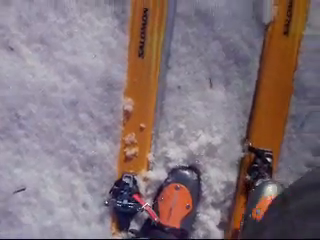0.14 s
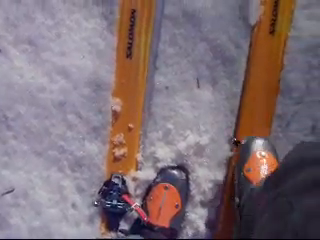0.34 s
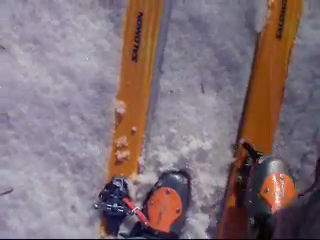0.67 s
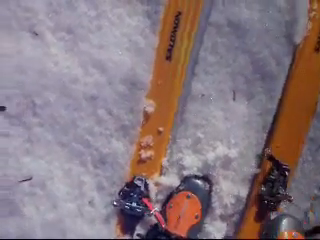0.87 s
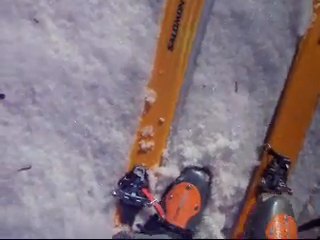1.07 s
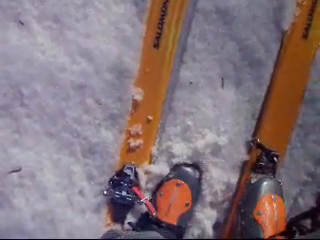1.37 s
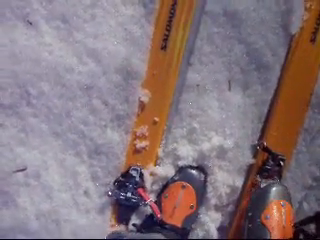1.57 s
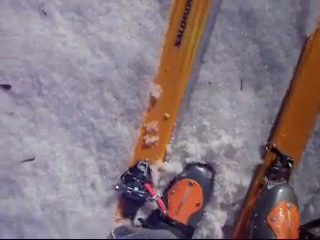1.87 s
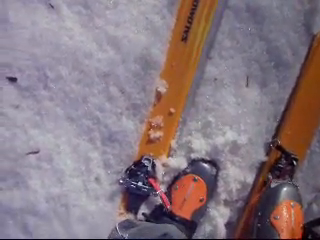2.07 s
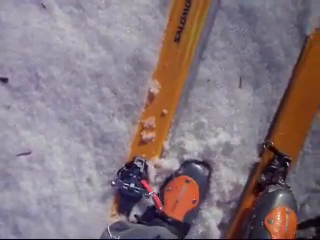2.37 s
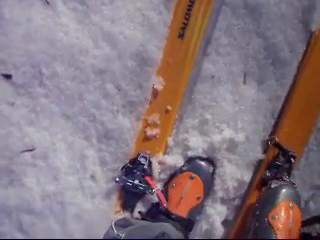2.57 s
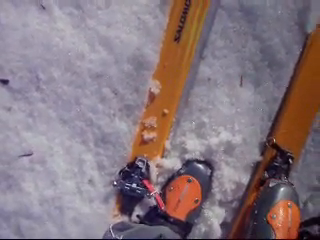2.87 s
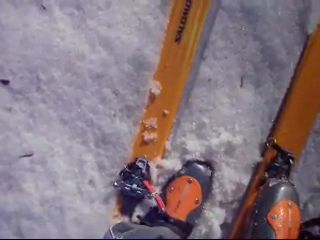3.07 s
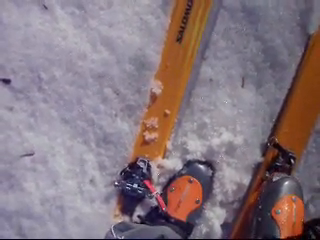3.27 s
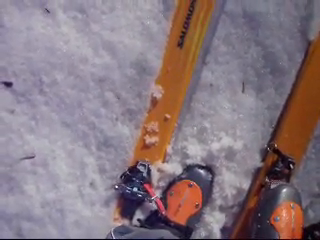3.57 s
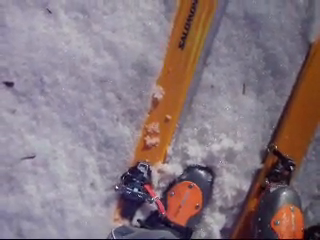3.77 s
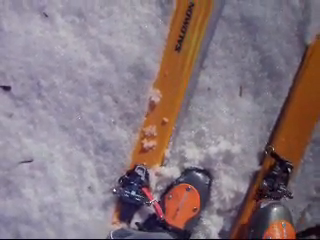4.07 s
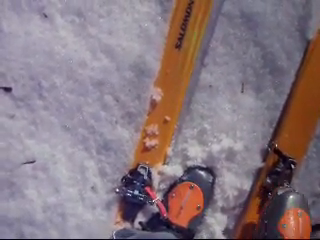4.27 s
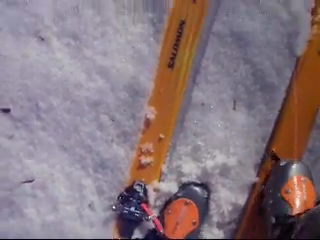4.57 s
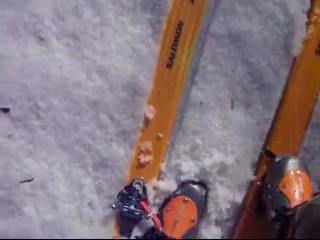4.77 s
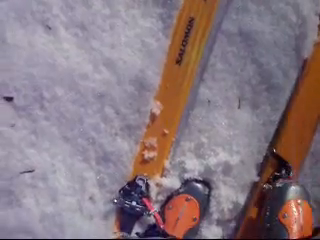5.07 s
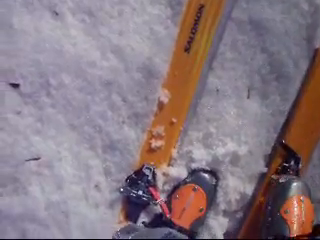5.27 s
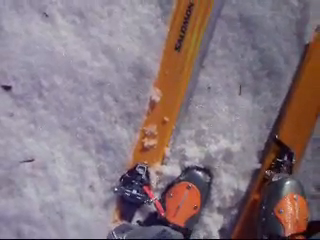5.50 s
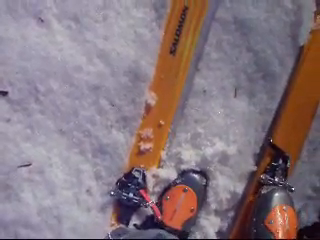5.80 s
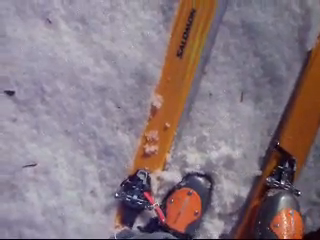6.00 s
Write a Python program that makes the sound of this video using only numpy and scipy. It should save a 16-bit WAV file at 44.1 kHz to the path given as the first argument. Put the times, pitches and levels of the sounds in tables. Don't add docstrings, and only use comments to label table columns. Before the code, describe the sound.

Outdoors on snow, a hard plastic ski boot is worked into a steel binding. A light knock and scrape come first, then a dense loud flurry of sharp clicks and scrapes. Softer scuffs and an isolated double click follow, then a long near-silence of faint hiss and dull bumps. A second short burst of clatter ends in a heavy clunk and fading ticks. The small camera microphone is close, coarse and harsh.

```python
import sys
import numpy as np
from scipy import signal
from scipy.io import wavfile
from scipy.ndimage import uniform_filter1d

SR = 44100
rng = np.random.default_rng(int(sys.argv[2]) if len(sys.argv) > 2 else 0)


def store_wav(level_fs):
    pcm = np.round(np.clip(np.atleast_2d(level_fs), -1, 1) * 32767)
    wavfile.write(sys.argv[1], SR, pcm.T.astype(np.int16))


def natural_amplitude(level_db):
    exponent = np.asarray(level_db, float) / 20
    return 10 ** exponent


N = 270754

# (frequency [Hz], bandwidth [Hz], level [dB])
MODES = [(375, 240, -7.5), (641, 240, -2), (967, 260, -1), (1250, 190, -3.5), (1560, 170, -4),
         (1794, 250, -3.5), (2227, 250, -3), (2527, 300, -3.5), (2911, 200, 0.5), (3105, 180, 2.5),
         (3257, 210, 3), (3490, 220, -1.5)]


def rms_one(x):
    return x / np.sqrt(np.mean(x ** 2) + 1e-20)


def drift(rate_hz):
    pole = np.exp(-80 * np.pi * rate_hz / SR)
    settling = 2000
    noise = rng.standard_normal(N // 40 + settling + 2)
    slow = signal.lfilter([1], [1, -2 * pole, pole * pole], noise)[settling:]
    return np.interp(np.arange(N) / 40, np.arange(len(slow)), rms_one(slow))


def resonance(x, hz, width_hz):
    r = np.exp(-np.pi * width_hz / SR)
    feedback = [1, -2 * r * np.cos(2 * np.pi * hz / SR), r * r]
    return signal.lfilter([(1 - r * r) / 2, 0, (r * r - 1) / 2], feedback, x)


def band(x, low_hz, high_hz):
    return signal.sosfilt(signal.butter(2, [low_hz, high_hz], "band", fs=SR, output="sos"), x)


def click(struck_hz, body_db, steel_db, t60_s):
    t = np.arange(4096) / SR
    rattle = rng.standard_normal(len(t)) * natural_amplitude(-60 * t / t60_s)
    rattle[:3] += 4.4
    mode_hz = [hz for hz, _, _ in MODES]
    colour_db = np.interp(np.log(mode_hz), np.log([600, 1500, 2900]), [body_db, 0, steel_db - 2.5])
    colour_db += 3.2 * rng.standard_normal(len(MODES))
    hit = natural_amplitude(colour_db.max() + 1.5) * resonance(rattle, struck_hz, 260)
    for (hz, width_hz, db), extra_db in zip(MODES, colour_db):
        hit += natural_amplitude(db + extra_db) * resonance(rattle, hz, 1.3 * width_hz)
    hit = signal.sosfilt(signal.butter(4, 4400, fs=SR, output="sos"), hit)
    return hit / np.abs(hit).max()


def clicks():
    # (time [s], peak [dB], struck part [Hz], plastic body, relative [dB])
    snaps = [(.55, -15, 2840, -12), (.592, -12, 3197, 7), (0.593, -12, 3030, -6), (.855, -9.5, 2510, -30),
             (0.882, -18, 3200, -22), (.932, -15.5, 3200, -15), (.964, -7.5, 2830, -7),
             (.983, -7, 2820, -5.5), (0.991, -16.5, 2800, -12), (1.084, -5, 2810, -25),
             (1.174, -11.5, 2660, -27), (1.186, -7, 3070, -38), (1.246, -17, 2700, -26),
             (1.267, -19.5, 2620, -12.5), (1.292, -10.5, 2590, -34), (1.355, -14.5, 2530, -24),
             (1.782, -19, 2570, -13), (2.5, -9.5, 3040, -14), (2.503, -12, 3280, -15),
             (2.912, -21.5, 3250, -11), (4.706, -9.5, 2670, -14), (4.72, -13, 2900, -11),
             (4.743, -17, 2850, -1), (4.811, -19, 2800, -5), (4.831, -23, 2900, -17),
             (4.869, -20.5, 3340, -28), (4.927, -10, 2410, -19), (5.104, -20, 2490, -21),
             (5.136, -22, 3160, -27), (5.971, -25, 3170, -19)]
    # (time [s], peak [dB], struck part [Hz], plastic body, relative [dB])
    knocks = [(.121, -27, 1556, -19), (.129, -13, 630, 7), (.561, -16, 1400, -14), (.582, -3.5, 1500, -10),
              (.605, -3.5, 1580, -7.5), (.914, -24.5, 1440, -20), (.92, -22, 820, 8),
              (1.395, -27.5, 1680, -1), (1.594, -29, 1330, -7), (1.706, -27.5, 2000, 15),
              (1.774, -25, 1010, -11), (1.793, -17, 2180, 13), (1.808, -26, 2180, 3),
              (1.859, -24, 695, -13), (2.217, -30, 1940, -13), (2.293, -30, 1507, 12),
              (2.425, -22, 1170, -7), (4.683, -24.5, 1370, -3), (4.758, -19.5, 2280, 6),
              (4.768, -21, 1070, -1), (4.78, -15, 2160, -6), (4.787, -27, 1030, 8), (4.798, -15, 2180, -12),
              (4.802, -22, 2220, -3), (4.856, -27, 1030, -18), (4.9144, -6, 2330, -12.5),
              (4.916, -3, 1480, -7.5), (5.165, -25, 2450, -15), (5.224, -26.5, 1250, -8),
              (6.025, -26.5, 1260, -19)]
    # (time [s], peak [dB], struck part [Hz])
    touches = [(0.104, -32, 910), (0.872, -26, 2720), (.188, -22, 2560), (.215, -22, 3000),
               (.277, -25, 2720), (0.288, -31, 2650), (.62, -24, 3200), (.635, -31, 930),
               (.651, -29.5, 3180), (1.203, -29, 3260), (1.366, -31, 2560), (2.418, -22, 3000),
               (2.514, -22, 2500), (3.465, -35.5, 1160), (3.748, -35, 3050), (4.822, -35, 3040),
               (4.908, -26.5, 2930), (5.322, -40, 1130), (5.506, -31, 1940), (5.59, -32, 1480),
               (5.709, -36.5, 1590), (5.782, -28.5, 3340), (5.812, -36, 598), (5.84, -31, 583),
               (5.923, -30, 2340), (6.003, -26.5, 3252), (6.128, -28, 505)]
    # (struck part [Hz], steel, relative [dB])
    steel_share = [(600, -8.5), (1500, -0.5), (2600, 0.5), (3300, 4.5)]
    snap_t60_s, knock_t60_s, touch_t60_s = .030, .032, .026
    touch_body_db = -1.5

    blows = [(*row, snap_t60_s) for row in snaps]
    blows += [(*row, knock_t60_s) for row in knocks]
    blows += [(*row, touch_body_db, touch_t60_s) for row in touches]
    share_hz, share_db = np.transpose(steel_share)
    out = np.zeros(N + 4096)
    for s, peak_db, struck_hz, body_db, t60_s in blows:
        steel_db = np.interp(np.log(struck_hz), np.log(share_hz), share_db)
        hit = click(struck_hz, body_db, steel_db, t60_s)
        at = round((s - .0006) * SR)
        out[at:at + len(hit)] += natural_amplitude(peak_db + 4.5) * hit
    return out[:N]


def grains(per_s, spread_db, clump_db):
    sizes = natural_amplitude(spread_db * np.minimum(rng.exponential(1, N), 5)) * rng.choice([-1, 1], N)
    struck = rng.random(N) < per_s / SR
    return sizes * struck * natural_amplitude(clump_db * drift(70))


def scrapes():
    # (start [s], hardest [s], end [s], steel level [dB], sole level relative to steel [dB])
    drags = [(0.111, 0.124, 0.14, -31, -8.5), (0.141, 0.206, .24, -37.5, -0.5),
             (0.263, 0.258, 0.36, -42.5, -4.5), (0.552, 0.575, 0.62, -27, 4),
             (0.625, 0.65, 0.72, -45.5, -8.5), (0.822, 0.872, 0.9, -31, -5.5),
             (0.906, 0.952, 1.053, -34.5, -0.5), (1.095, 1.108, 1.18, -34, -9),
             (1.55, 1.586, 1.58, -47, 0.5), (1.644, 1.795, 2.02, -41.5, -0.8),
             (2.394, 2.422, 2.5, -45.5, -1), (2.501, 2.51, 2.55, -40.5, -3.5), (2.528, 2.54, 2.47, -50, -9),
             (4.701, 4.72, 4.73, -20.5, -1.5), (4.742, 4.765, 4.81, -37.5, 0.5),
             (4.81, 4.817, 4.86, -40.5, 0), (4.914, 4.922, 5.0, -44.5, -4),
             (5.123, 5.135, 5.17, -34.5, -3.5), (5.137, 5.18, 5.18, -32, 1.5), (5.202, 5.22, 5.37, -49, -5),
             (5.483, 5.53, 5.53, -50, 1), (5.9, 6.0, 6.07, -48.5, -4), (2.17, 2.222, 2.36, -53.5, -4),
             (3.435, 3.47, 3.46, -52, 0)]
    edge_db, hold = -12.5, 2.8
    shell_db, shell_follows = -6.5, 0.95

    grit = grains(per_s=9000, spread_db=1.9, clump_db=1.3)
    ring = []
    for k, (hz, width_hz, db) in enumerate(MODES):
        gain = (-1) ** k * natural_amplitude(db + 1.7 * drift(17))
        ring.append(gain * resonance(grit, hz, 1.6 * width_hz))
    steel, sole, shell = sum(ring[7:]), sum(ring[3:7]), sum(ring[:3])
    groups = np.array([rms_one(steel), rms_one(sole), rms_one(shell)])

    pressure, t = np.zeros((3, N)), np.arange(N) / SR
    for start, hardest, end, steel_db, sole_db in drags:
        span = slice(round(start * SR), round(end * SR))
        swell_db = edge_db * np.interp(t[span], [start, hardest, end], [1, 0, 1]) ** hold
        group_db = np.array([[0], [sole_db], [shell_db + shell_follows * sole_db]])
        pressure[:, span] += natural_amplitude(2.0 + steel_db + swell_db + group_db)
    return np.sum(uniform_filter1d(pressure, size=160) * groups, axis=0)


def bumps():
    # (time of peak [s], peak [dB], frequency [Hz])
    pushes = [(.13, -33, 316), (.583, -22.5, 271), (.606, -29, 310), (0.94, -35, 325), (.964, -31, 350),
              (.983, -30, 350), (0.999, -31, 370), (1.018, -25.5, 320), (1.083, -29.5, 308),
              (1.1, -35, 282), (1.155, -33.5, 304), (1.186, -36.5, 316), (1.477, -27, 191),
              (1.555, -43, 240), (1.617, -35.5, 189), (1.773, -35, 305), (1.839, -28, 367),
              (1.876, -33, 270), (2.464, -36, 169), (2.504, -31.5, 268), (3.15, -39, 145),
              (3.201, -38.5, 154), (3.224, -37, 248), (3.655, -34.5, 259), (3.974, -34, 264),
              (4.155, -38, 140), (4.716, -32, 315), (4.916, -18.5, 360), (5.177, -20, 348.5),
              (5.795, -36.5, 275)]
    out, t = np.zeros(N + 4096), np.arange(4096) / SR
    for s, peak_db, hz in pushes:
        rise = t * hz / 0.59
        swell = (rise * np.exp(1 - rise)) ** 2
        at = round((s - 1.1 / hz) * SR)
        out[at:at + len(t)] += natural_amplitude(peak_db + 0.5) * swell * np.sin(2 * np.pi * hz * t)
    return out[:N]


def breeze():
    # (frequency [Hz], level per Hz [dB])
    spectrum = [(18, -42), (30, -20), (131, -7.5), (281, -3), (317, -6), (350, -2.5), (753, -4.5),
                (867, -5), (1320, -8.5), (3700, -11.5), (4810, -47), (8140, -120)]
    # (time [s], level [dB])
    strength = [(0.0, -47), (.58, -44), (1.02, -46), (1.5, -45.5), (2.5, -47.5), (3.1, -48), (4.14, -47),
                (4.4, -48), (4.92, -44.5), (5.44, -48), (6.14, -45.5)]
    s, db = np.transpose(strength)
    air_db = np.interp(np.arange(N) / SR, s, db)
    white = rng.standard_normal((2, N))
    band_edges_hz = 40 * 2 ** np.arange(0, 7, .5)
    hz, db = np.transpose(spectrum)
    far = np.zeros(N)
    for k, (low, high) in enumerate(zip(band_edges_hz, band_edges_hz[1:])):
        band_db = np.interp(np.log(low * high) / 2, np.log(hz), db)
        far += natural_amplitude(band_db + 1.2 * drift(6)) * band(white[k % 2], low, high)
    return natural_amplitude(air_db + 1.0) * rms_one(far)


def wind():
    # (time [s], peak [dB])
    puffs = [
        (.58, -47),
        (1.02, -48),
        (1.47, -37.5),
        (2.48, -43),
        (3.13, -53),
        (3.64, -55.5),
        (4.14, -52),
        (4.92, -49),
    ]
    calm_db, rise_db_per_s, fall_db_per_s = -64.5, 113, 105.5
    t = np.arange(N) / SR
    wind_db = np.full(N, calm_db)
    for s, db in puffs:
        below_peak_db = np.maximum(rise_db_per_s * (s - t), fall_db_per_s * (t - s))
        wind_db = np.maximum(wind_db, db - below_peak_db)
    lumpy = band(rng.standard_normal(N), 70, 260) * natural_amplitude(4.6 * drift(5.9))
    return natural_amplitude(wind_db - 5.5) * rms_one(lumpy)


def scene():
    near = clicks() + scrapes()
    lag = round(.0032 * SR)
    near[lag:] += natural_amplitude(-19.0) * near[:-lag]
    return (near + bumps() + breeze() + wind())[None]


def drop_faint(x):
    # (low edge [Hz], high edge [Hz], limit [dB])
    faint_bands = [
        (20, 100, -66.5),
        (3900, 4100, -95),
        (7860, 8140, -84),
        (11900, 12150, -79),
    ]
    masked = uniform_filter1d(x ** 2, size=1000) * natural_amplitude(-44) ** 2
    for low_hz, high_hz, limit_db in faint_bands:
        sos = signal.butter(3, [low_hz, high_hz], "band", fs=SR, output="sos")
        part = signal.sosfiltfilt(sos, x)
        faint = uniform_filter1d(part ** 2, size=2000) < natural_amplitude(limit_db) ** 2 + masked
        x = x - uniform_filter1d(1. * faint, size=600) * part
    return x


def roll_off(x):
    return signal.sosfilt(signal.butter(12, 13280, fs=SR, output="sos"), x)


def record(dry):
    sample_hz, step = 8001.4, 1 / 128
    x = signal.sosfilt(signal.cheby1(7, .5, 3320, fs=SR, output="sos"), dry[0])
    x = .85 * np.tanh(x / .85)
    tick = np.floor(np.arange(N) * sample_hz / SR)
    held = np.interp(tick * SR / sample_hz, np.arange(N), x)
    held += natural_amplitude(-57) * rng.standard_normal(N)[tick.astype(int)]
    held = np.clip(np.floor(held / step), -128, 127) * step
    held = signal.sosfilt(signal.ellip(9, .5, 48, 12630, fs=SR, output="sos"), held)
    mix = drop_faint(held)[None]
    return roll_off(mix)


dry = scene()
out = record(dry)
store_wav(out)
```